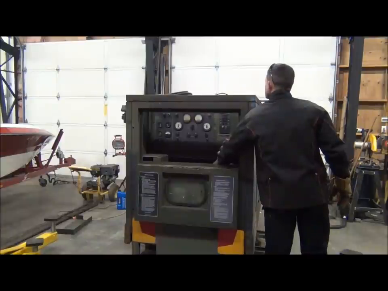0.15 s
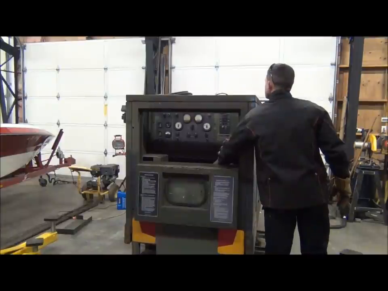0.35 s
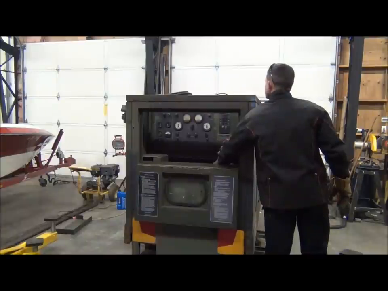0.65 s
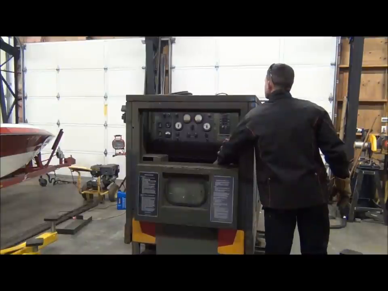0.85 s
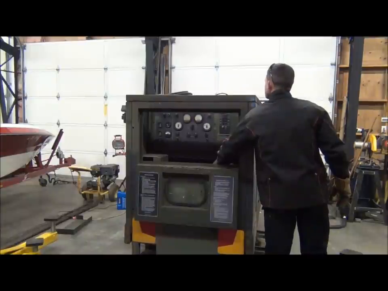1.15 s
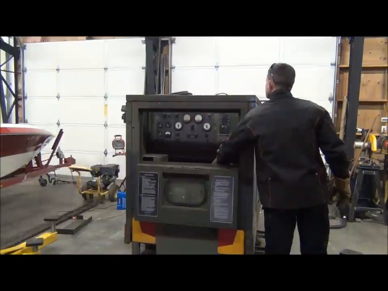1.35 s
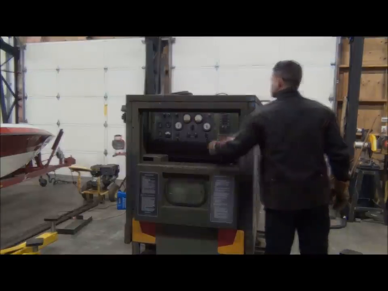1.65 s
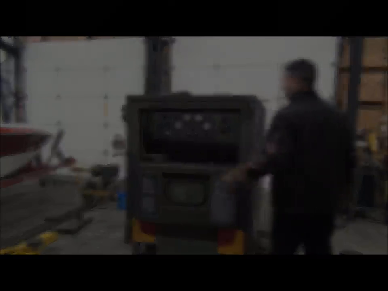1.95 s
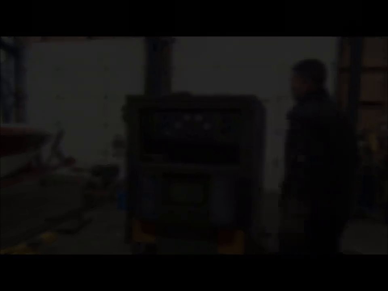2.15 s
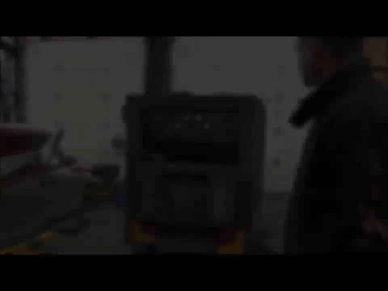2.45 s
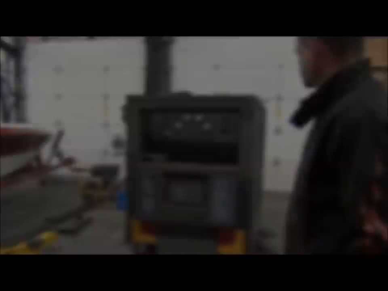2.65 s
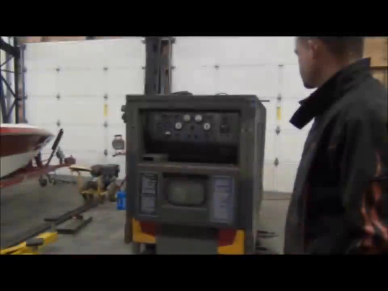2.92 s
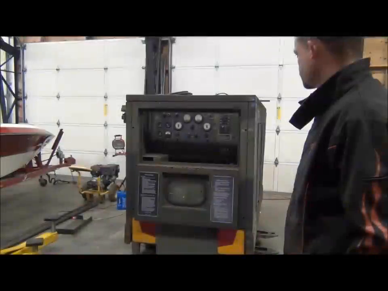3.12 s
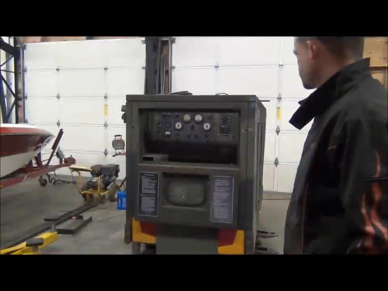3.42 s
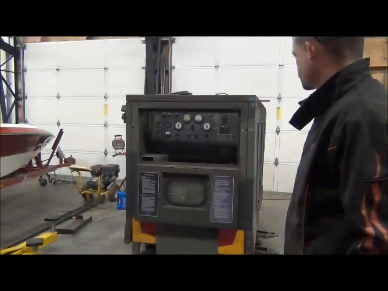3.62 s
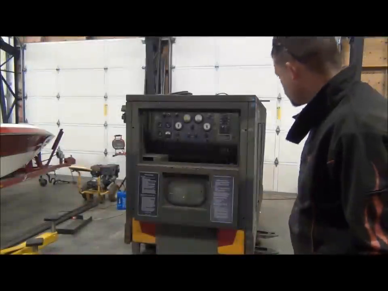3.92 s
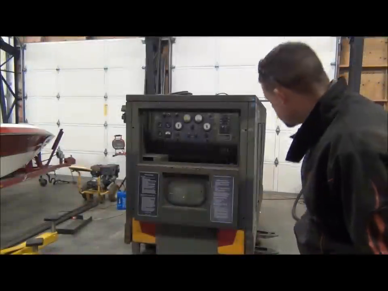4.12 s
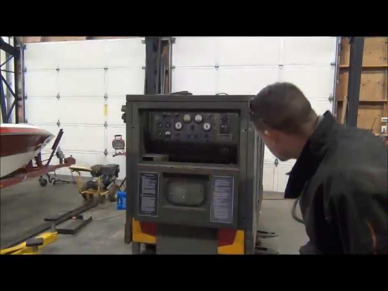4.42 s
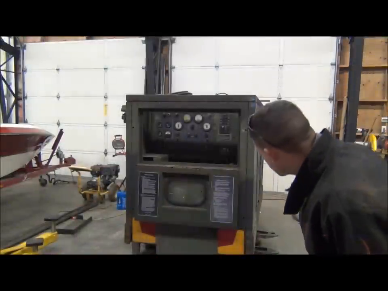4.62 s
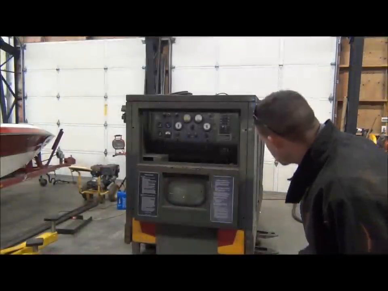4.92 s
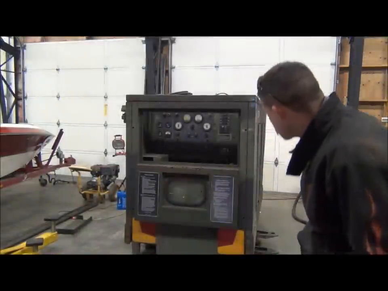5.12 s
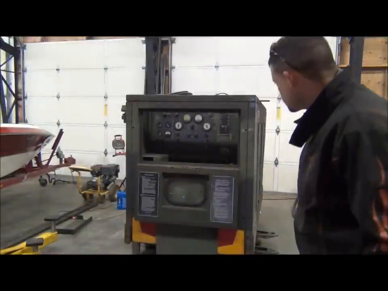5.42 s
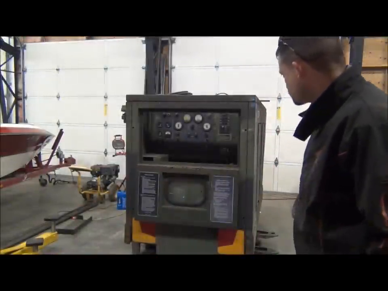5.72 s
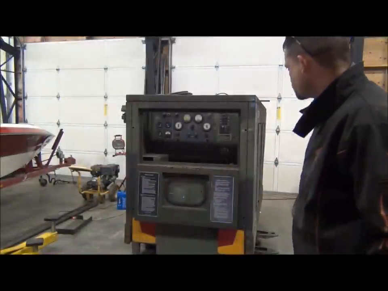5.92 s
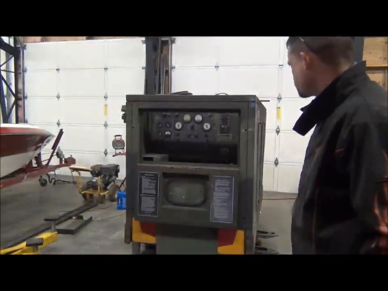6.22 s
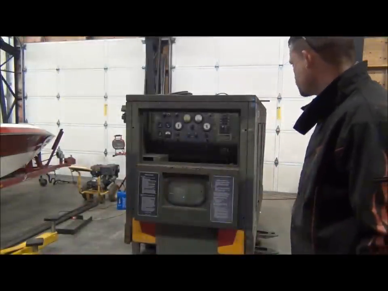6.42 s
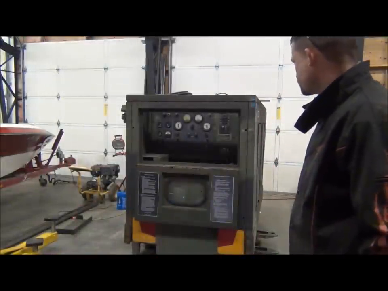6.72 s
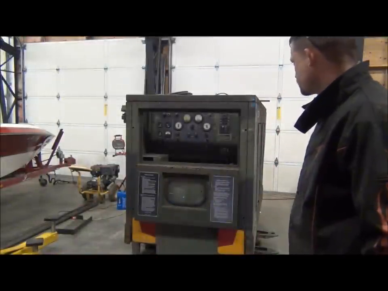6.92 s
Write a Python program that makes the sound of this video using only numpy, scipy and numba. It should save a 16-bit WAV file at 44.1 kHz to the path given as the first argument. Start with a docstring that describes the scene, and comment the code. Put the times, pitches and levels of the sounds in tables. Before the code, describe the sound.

Heavy diesel engine running close by, its bass hum fluttering against a cooling fan's tone, with rattle and hiss, dipping smoothly then swelling back.

```python
"""A diesel generator in a workshop: a heavy exhaust drone beats against a fan's blade tone, with clatter and air.
The four-cylinder engine turns at about 1500 rpm, a few metres from a camera's microphone pair.
Drone and fan are sums of sines; clatter is a ring repeated every four firings; air is noise that puffs with them.
The sound crossfades from one stretch of running to another.
The camera's limiter pumps on the beat; the level fades down and comes back."""
import sys
import numpy as np
from scipy.fft import rfft, irfft, next_fast_len
from scipy.io import wavfile
from scipy.ndimage import map_coordinates
from numba import njit

SR = 44100
rng = np.random.default_rng(int(sys.argv[2]) if len(sys.argv) > 2 else 0)


def materialize(psi):
    """Save the field psi as 16-bit PCM at rate SR to the path in sys.argv[1].

    A 1-D psi becomes a single channel; in a 2-D psi each row is a channel.
    """
    bounded = np.clip(np.atleast_2d(psi).T, -1, 1)
    quanta = np.round(bounded * 32767).astype(np.int16)
    wavfile.write(sys.argv[1], SR, quanta)


N = 311346


def amp(db):
    """Decibels to gain."""
    return 10 ** (np.asarray(db) / 20)


def along(points, hz):
    """Read (f/Hz, value) points at hz on a log frequency axis."""
    f, value = np.transpose(points)
    return np.interp(np.log(hz + 1), np.log(f + 1), value)


def wobble(rate):
    """A smooth random curve, rate knots a second."""
    knots = rng.standard_normal(int(N * rate / SR) + 4)
    return map_coordinates(knots, [np.arange(N) * rate / SR])


def filtered(x, response):
    """x through a complex response of frequency."""
    size = next_fast_len(N + SR // 2)
    spectrum = rfft(x, size) * response(np.fft.rfftfreq(size, 1 / SR))
    return irfft(spectrum, size)[..., :N]


# Exhaust and housing lines, levels relative to each other:
# [multiple of the crank speed, level/dB in the first stretch, level/dB in the second stretch]
ENGINE_ORDERS = [(2.0, -37, -38.5), (3.0, -43, -42.5), (4.0, -27.5, -28.5), (5.0, -39, -38),
                 (6.0, -22, -22), (7.0, -39, -36), (8.0, -27, -40.5), (9.0, -26.5, -26.5),
                 (10.0, -35, -33.5), (11.0, -36, -39), (12.0, -39.5, -38), (14.0, -43, -41),
                 (14.5, -40, -43), (16.0, -39.5, -39), (20.0, -35.5, -46.5), (26.0, -39.5, -40),
                 (29.0, -47, -41.5), (39.57, -42, -47), (40.4, -53, -47), (41.5, -40, -48),
                 (44.9, -48, -45), (45.37, -44.5, -43), (46.08, -44, -48), (46.56, -41, -37.5),
                 (49.14, -50, -45), (49.33, -38, -43), (52.0, -42.5, -46.5), (55.6, -44, -47),
                 (80.8, -53, -45), (89.0, -54, -48.5)]


def drone(crank_turns, crossfade, waver_db=0.5, waver_per_order_db=0.0387, jitter_turns=0.0012):
    """Exhaust and housing sound on multiples of half the crank speed; the higher lines waver more."""
    start_turns = rng.random(len(ENGINE_ORDERS))
    strongest = np.argmax(np.array(ENGINE_ORDERS)[:, 2])
    start_turns -= start_turns[strongest]  # angles count from the strongest line
    # the crank turns a little unevenly, which blurs the high lines
    crank_turns = crank_turns + jitter_turns * wobble(25)
    out = np.zeros(N)
    for (order, first_db, second_db), angle in zip(ENGINE_ORDERS, start_turns):
        order = np.round(2 * order) / 2  # a four-stroke cycle takes two turns
        line_db = first_db + crossfade * (second_db - first_db)
        line_db = line_db + (waver_db + waver_per_order_db * order) * wobble(6)
        out += amp(line_db) * np.sin(2 * np.pi * (order * crank_turns + angle))
    return np.sqrt(2) * out


# Overtones of the fan: [multiple of the blade rate, level/dB against the blade tone]
FAN_OVERTONES = [(2, -21.5), (3, -20.5)]


def fan(blade_hz, flutter_passes=0.015, waver_db=0.5, overtone_waver_db=3):
    """Blades chop uneven air: a steady tone with restless overtones."""
    passes = np.cumsum(blade_hz) / SR + flutter_passes * wobble(14)
    tone = amp(waver_db * wobble(8)) * np.sin(2 * np.pi * passes)
    for multiple, db in FAN_OVERTONES:
        level = amp(db + overtone_waver_db * wobble(12))
        tone += level * np.sin(2 * np.pi * (multiple * passes + rng.random()))
    return np.sqrt(2) * tone


# Sound off the workshop walls, unlike at the two microphones: [f/Hz, level/dB against the direct sound]
WALL_SOUND = [(60, -18), (300, -10), (1000, -10), (4500, -10), (9000, -10.5), (14000, -20)]


def radiate(white, spectra, crossfade):
    """Colour a white (direct, walls) pair, crossfading from first to second spectrum; gives left and right."""
    hz_points, *levels = np.array(spectra).T
    first, second = [filtered(white, lambda hz: amp(along(np.c_[hz_points, db], hz))) for db in levels]
    direct, walls = np.sqrt(SR / 2) * (first + crossfade * (second - first))  # from density per Hz
    walls = filtered(walls, lambda hz: amp(along(WALL_SOUND, hz)))
    return np.array([direct + walls, direct - walls])


def bursts(firings, depth, decay, scatter_db):
    """Envelope of rms 1 that jumps at each firing and dies over a share of the stroke."""
    stroke = firings.astype(int)
    size = amp(scatter_db * rng.standard_normal(stroke.max() + 1))
    envelope = 1 + depth * size[stroke] * np.exp(-(firings % 1) / decay)
    return envelope / np.sqrt(np.mean(envelope ** 2))


# Clatter of the block and housing, relative density:
# [f/Hz, level/dB per Hz in the first stretch, level/dB per Hz in the second stretch]
CLATTER_SPECTRA = [(120, -82, -68), (242, -53.5, -57.5), (403, -53.5, -55.5), (596, -58.5, -59.3),
                   (830, -59, -59.5), (1070, -57, -59), (1220, -54, -56), (1490, -60, -63),
                   (2280, -61.5, -63), (2870, -66.5, -65), (3580, -74, -73), (5060, -77, -79.5),
                   (9000, -87, -86)]
START_KNOCK_DB = 0.8  # the diesel knocks this much harder at the start, while still under speed


def clatter(firings, crossfade, lag, jitter_s=0.00004, uneven_db=3.5, level_db=-0.2):
    """Combustion, injectors and valves ring the block in nearly the same way every four firings."""
    size = 3490  # points in one stored engine cycle
    count = size // 2 + 1
    # the block's dense modes answer every multiple of the cycle rate, somewhat unevenly
    strength = amp(uneven_db * rng.standard_normal((2, count)))
    lines = strength * np.exp(2j * np.pi * rng.random((2, count)))
    # the strongest multiples belong to the drone
    lines[0, np.round(2 * np.array(ENGINE_ORDERS)[:, 0]).astype(int)] = 0
    place = firings / 4 * size
    place = place + jitter_s * SR * wobble(60)  # no two cycles take quite the same time
    cycles = irfft(lines)
    ring = np.array([map_coordinates(c / c.std(), [place % size], mode="grid-wrap") for c in cycles])
    knocks = ring * bursts(firings, depth=0.43, decay=0.14, scatter_db=2.5)
    return amp(level_db + START_KNOCK_DB * lag) * radiate(knocks, CLATTER_SPECTRA, crossfade)


# Rush of air and exhaust gas, relative density:
# [f/Hz, level/dB per Hz in the first stretch, level/dB per Hz in the second stretch]
AIR_SPECTRA = [(20, -66, -69), (60, -63, -62), (153, -47, -50.5), (225, -49, -54.5), (295, -56.5, -59.5),
               (490, -52.5, -56.5), (770, -60.5, -60), (1180, -58, -60.5), (1660, -62, -63),
               (2540, -65, -67.5), (3940, -71.5, -72), (6200, -71.3, -71.3), (7500, -73, -73),
               (11400, -73, -72.5), (15500, -85.5, -84)]


def air(firings, crossfade, level_db=0, gust_db=0.45):
    """Cooling air and exhaust gas rush out, puffing a little with each firing."""
    noise = rng.standard_normal((2, N)) * bursts(firings, depth=0.3, decay=0.25, scatter_db=4.5)
    return amp(level_db + gust_db * wobble(70)) * radiate(noise, AIR_SPECTRA, crossfade)


# Phase between the microphones: [f/Hz, radians by which the left one leads]
LEFT_LEAD = [(40, -.25), (160, -0.49), (350, -0.63), (700, -0.32), (1300, -0.23), (4500, -0.024),
             (15000, 0)]
# Balance between the microphones: [f/Hz, left minus right level/dB]
LEFT_TILT = [(60, 0), (200, 1.6), (700, .5), (4000, 0.5), (8000, 0)]


def microphones(sound):
    """Two close microphones hear the machine with differing phase and level, split evenly between them."""
    sides = np.array([[0.5], [-0.5]])
    return filtered(sound, lambda hz: amp(sides * along(LEFT_TILT, hz)) * np.exp(1j * sides * along(LEFT_LEAD, hz)))


# The sound crossfades from one stretch of running to another: [start t/s, end t/s]
CROSSFADE_S = (1.6, 2.95)
# governed firing rate, and fan blade passes per firing, set by the belt
FIRING_HZ, BLADES_PER_FIRING = 50.595, 3.3226
# the engine starts this far under its firing rate; the governor closes the gap with this time constant
START_LAG_HZ, GOVERNOR_S = 0.9, 0.46
# relative levels: exhaust drone, fan in the first stretch, fan in the second stretch
EXHAUST_DB, FAN_FIRST_DB, FAN_SECOND_DB = 0.16, -20, -21
TONES_DB, START_TONES_DB = 1.5, -2.5  # both tones together, and their change at the start
# the drone thins out for a moment: centre, half width, depth
THIN_S, THIN_WIDTH_S, THIN_DB = 2.41, 0.28, -6
SLIP = 0.205  # meanwhile the beat slips: drone and clatter move ahead by this share of a firing


def scene():
    """The governed engine and its belt-driven fan, heard by two close microphones."""
    t = np.arange(N) / SR
    lag = np.exp(-t / GOVERNOR_S)  # 1 at the start, towards 0 at full speed
    crossfade = np.interp(t, CROSSFADE_S, [0, 1])  # 0 in the first stretch, 1 in the second
    thin = np.exp(-((t - THIN_S) / THIN_WIDTH_S) ** 2)
    firing_hz = FIRING_HZ - START_LAG_HZ * lag
    firings = np.cumsum(firing_hz) / SR + SLIP * np.cumsum(thin) / thin.sum()
    fan_db = FAN_FIRST_DB + crossfade * (FAN_SECOND_DB - FAN_FIRST_DB)
    # two firings a turn; the sixth order beats against the blade tone 16 times a second
    tones = amp(EXHAUST_DB + THIN_DB * thin) * drone(firings / 2, crossfade)
    tones = tones + amp(fan_db) * fan(BLADES_PER_FIRING * firing_hz)
    sound = amp(TONES_DB + START_TONES_DB * lag) * tones
    sound = sound + clatter(firings, crossfade, lag) + air(firings, crossfade)
    return microphones(sound)


@njit
def follow(x, rise, fall):
    """Peak follower with separate rise and fall rates per sample."""
    out, level = np.empty_like(x), x[:2000].max()
    for i in range(len(x)):
        level += (x[i] - level) * (rise if x[i] > level else fall)
        out[i] = level
    return out


def limiter(x, threshold_db=-19, slope=0.76, attack_s=0.00091, release_s=0.023, ahead_s=0.00406, makeup_db=5.5):
    """Fast gain control that looks ahead: each swell of the bass beat pushes the clatter and hiss down."""
    peak = follow(np.abs(x).max(axis=0), 1 / (attack_s * SR), 1 / (release_s * SR))
    peak = np.interp(np.arange(N) + ahead_s * SR, np.arange(N), peak)
    gain = np.minimum(1, amp(threshold_db) / (peak + 1e-9)) ** slope
    return x * amp(makeup_db) * gain


# The level fades down and up again in straight lines: [start t/s, lowest t/s, end t/s]
DIP_TIMES_S = (0.38, 2.46, 4.24)
FULL_DB, DIP_DB = 0.46, -9  # gain outside the dip and at its bottom
TOP_HZ = 15720  # nothing passes above this


def record(dry):
    """The limiter, the dip in level, and the band limit."""
    fade = np.interp(np.arange(N) / SR, DIP_TIMES_S, amp([FULL_DB, DIP_DB, FULL_DB]))
    return filtered(limiter(dry) * fade, lambda hz: hz < TOP_HZ)


dry = scene()
out = record(dry)
materialize(out)
```